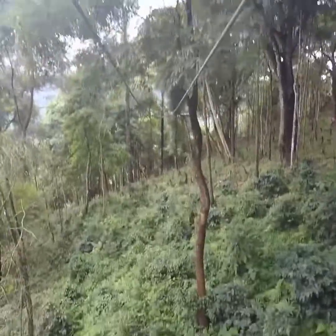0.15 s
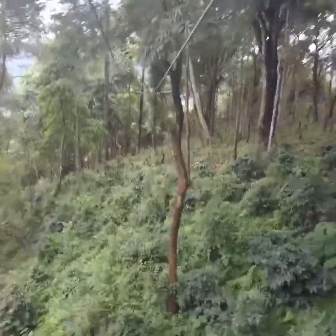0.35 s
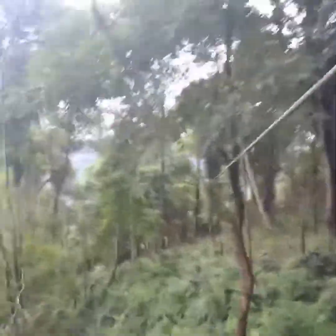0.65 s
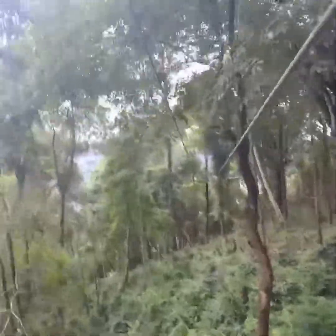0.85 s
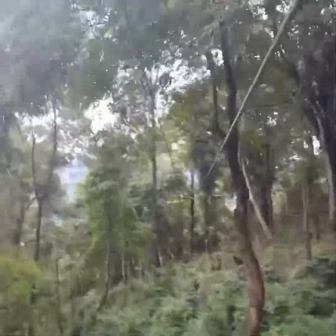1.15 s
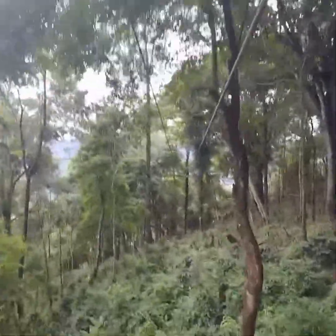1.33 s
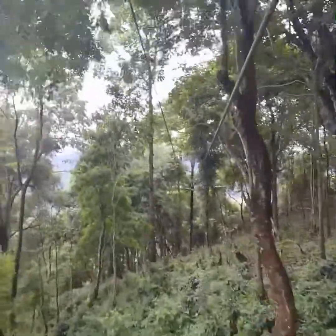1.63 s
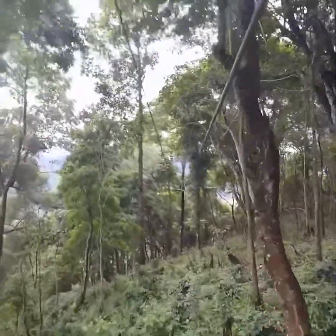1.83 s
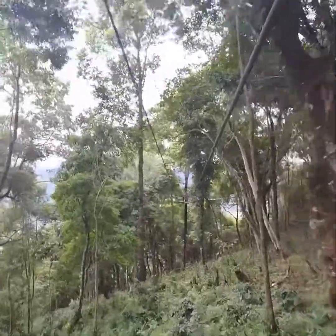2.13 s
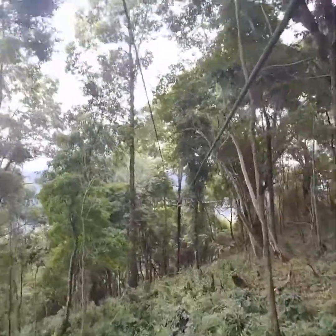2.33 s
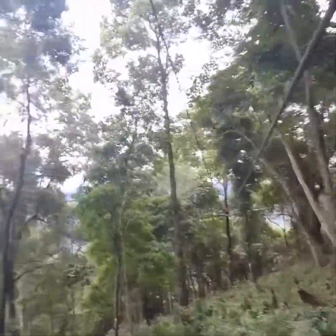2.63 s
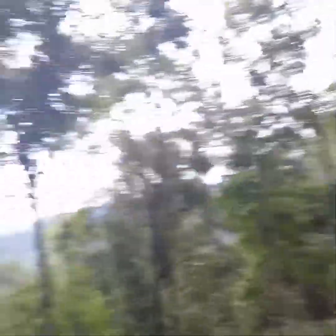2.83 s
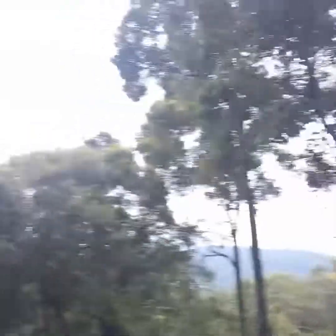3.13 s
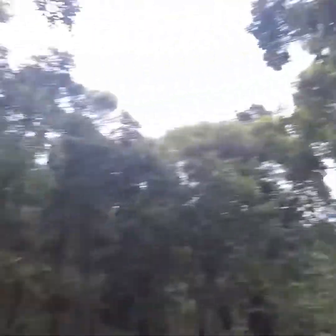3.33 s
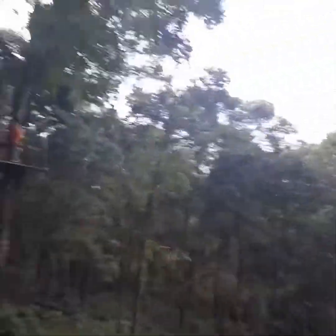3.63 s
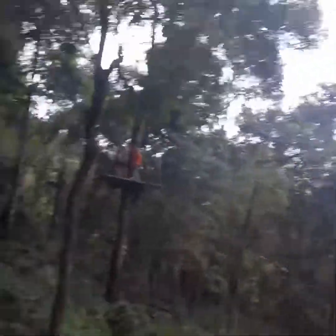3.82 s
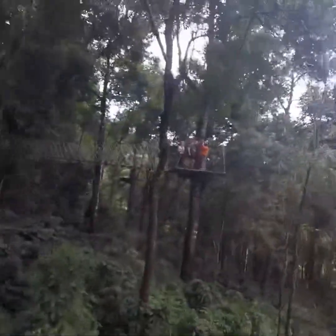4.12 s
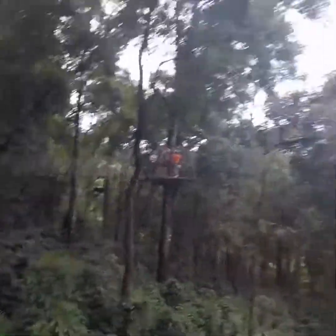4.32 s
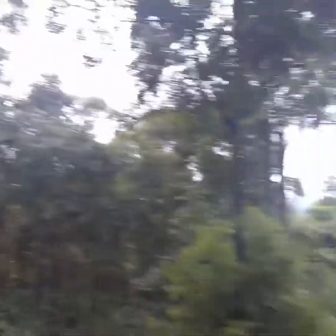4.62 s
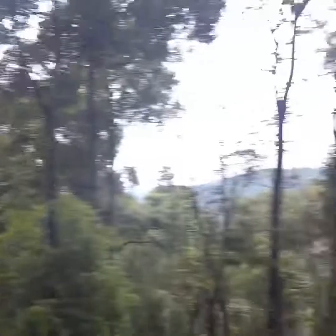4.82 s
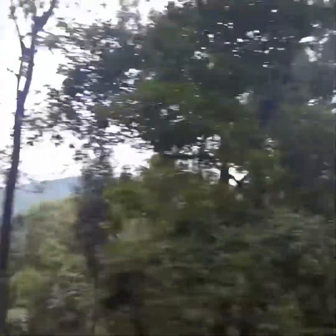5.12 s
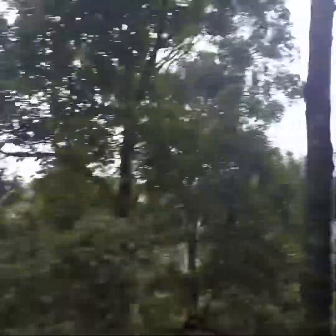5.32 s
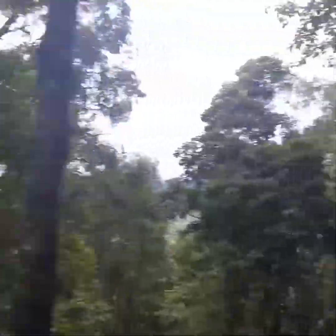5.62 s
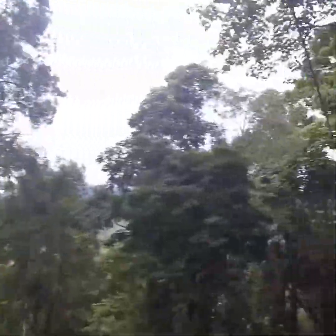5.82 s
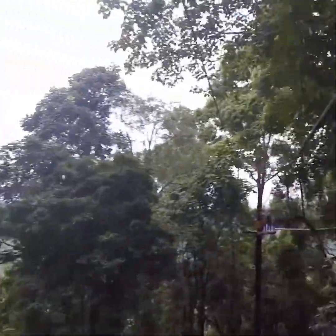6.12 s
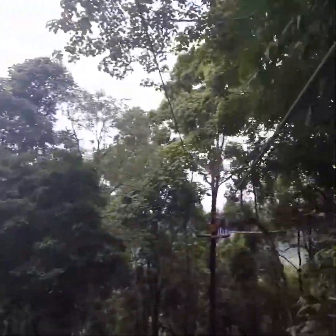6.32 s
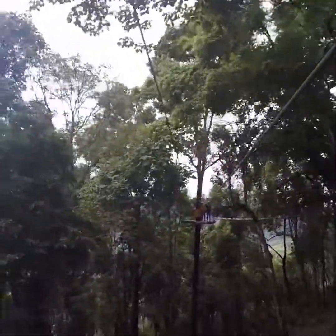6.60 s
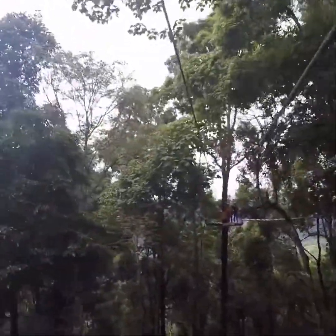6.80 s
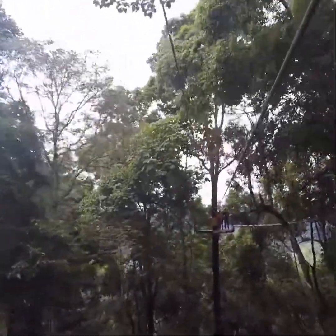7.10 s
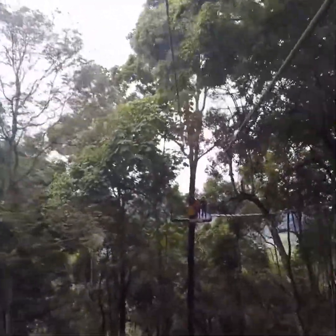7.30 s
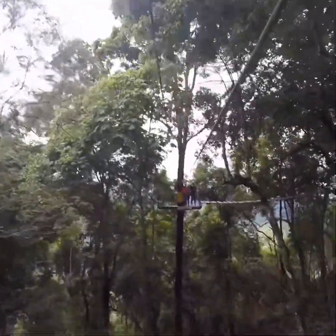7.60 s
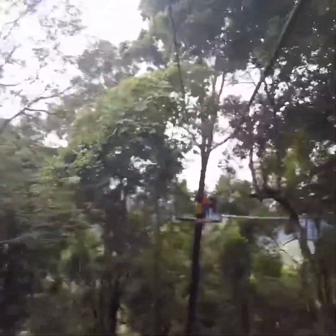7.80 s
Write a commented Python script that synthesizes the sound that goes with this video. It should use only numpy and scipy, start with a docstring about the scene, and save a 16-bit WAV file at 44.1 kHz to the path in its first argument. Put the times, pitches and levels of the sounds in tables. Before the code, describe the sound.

Outdoors in forest, heard close from a rider's hand-held camera, mono. At 0 s a rapid cluster of tiny steel hook ticks sits over faint, gritty wheel hiss; more ticks come near 0.5 and 0.6 s as wind rumble surges, and a clearer one at 1.1 s. The hiss swells quickly by 1.2 s into bright, patchy metallic rolling, and a whine emerges, climbing steadily as the trolley accelerates. Soft wind pops flutter throughout. Around 2.8-3.5 s the hand rubs and lightly knocks the case while the camera swings aside; the hiss softens and shifts colour until about 4.4 s, then returns stronger. From 5 s the whine holds high, dipping briefly at jolts roughly every 0.3 s, with the hiss sagging just before each. Hard hollow knocks hit at 7.5, 7.7 and 7.8 s with rubbing and a wind surge, the pitch easing slightly, still rolling at the 8 s end.

```python
"""Zipline: a steel trolley gathers speed on the cable above a hand-held camera that turns aside and back.
Rolling hiss is patchy noise through frame resonances; the whine is harmonics of the strand-crossing rate.
A snap hook taps the frame, and the hand knocks and rubs the camera case: impulses and noise through modes.
Wind on the single microphone is low rumble, flutter and short pops."""
import sys
import numpy as np
from scipy import signal
from scipy.fft import rfft, irfft, next_fast_len
from scipy.io import wavfile
from scipy.ndimage import uniform_filter1d, map_coordinates

SR = 44100
rng = np.random.default_rng(int(sys.argv[2]) if len(sys.argv) > 2 else 0)


def materialize(psi):
    """Save the field psi as 16-bit PCM at rate SR to the path in sys.argv[1].

    A 1-D psi becomes a single channel; in a 2-D psi each row is a channel.
    """
    bounded = np.clip(np.atleast_2d(psi).T, -1, 1)
    quanta = np.round(bounded * 32767).astype(np.int16)
    wavfile.write(sys.argv[1], SR, quanta)


N = 350595

# where the camera faces: t/s, heading (0 at the start, 1 ahead, 2 aside, 3 swinging back, 4 down the line)
HEADING = [(0, 0), (.95, 0), (1.25, 1), (3.05, 1), (3.4, 2), (4.38, 2), (4.5, 3), (4.8, 3), (5.75, 4),
           (7.95, 4)]
# jolts along the cable, brief dips in the whine's pitch and swings in the hiss:
# t/s, strand-rate drop/Hz, later strand-rate rise/Hz, hiss sag just before/dB (negative: swell)
JOLTS = [(2.06, 8, 3, -1.5), (2.4, 8, 3, -0.5), (2.53, 7, 3, -0.5), (2.905, 12, 5, 0.5), (3.16, 9, 7, 0.5),
         (4.504, 32, 5, 1), (4.65, 8, 0, 0), (4.926, 25, 0, 1), (5.364, 23.5, -8, 2.5), (5.771, 24, 6, 2),
         (6.15, 26, 10, 0.5), (6.47, 26, 3, 2), (6.784, 30, 3, 2), (7.085, 18, -2, 2), (7.36, 30, 5.5, 1.5),
         (7.61, 12, 2.5, 1), (7.845, 36, 1, 0.5)]


def hiss():
    """Wire roughness shakes the frame in fine spurts; each heading weights its resonances differently."""
    # rolling hiss: t/s, level/dB, treble gain/dB
    roll = [(0.0, -38, -3.5), (0.14, -34.5, -3), (0.42, -40.5, -1), (0.63, -31.5, -2), (0.78, -31, -2),
            (0.98, -25, -2.5), (1.18, -20, -1.5), (1.5, -22, 1.5), (1.72, -20, -1), (2.15, -21.5, 1),
            (2.36, -21, 4), (2.6, -19.5, 1.5), (3.05, -19, -0.5), (3.22, -20, -0.5), (3.36, -23.5, -3.5),
            (3.5, -24, 0), (3.75, -22, -4), (3.92, -23.5, 2.5), (4.3, -25, 1), (4.65, -20, -1),
            (5.05, -20, 2), (5.5, -19, 1.5), (6.15, -18, 0), (6.9, -17.5, -2.5), (7.95, -18, -1.5)]
    level_db, bright_db = curves(roll)
    heading = curves(HEADING)[0]

    shaking = frame_modes(roughness())
    out = 0
    for k, heard in enumerate(shaking):
        facing = np.clip(1 - np.abs(heading - k), 0, 1)
        out = out + facing * unit(heard)

    treble = filtered(out, lambda f: 1 / (1 + (5100 / (f + 1)) ** 12))
    body = out - treble
    jolt_s, _, _, sag_db = np.transpose(JOLTS)
    sag_lead_s, sag_width_s, treble_share = 0.11, 0.083, 0.35
    sag_db = dips(jolt_s - sag_lead_s, sag_db, sag_width_s, sag_width_s)
    mix = amp(-sag_db) * body + amp(bright_db - treble_share * sag_db) * treble
    return amp(level_db) * notched(mix)


def roughness():
    """Noise in random spurts, with extra level swings while the wheels creep."""
    spurts = amp(.35 * wobble(90) + .75 * wobble(250) + 1.1 * wobble(600))
    creep_db, creep_knots_per_s, creep_end_s = 2, 220, 1.0
    # full for the first half of the creep, then faded out
    creep = np.clip(2 - 2 * np.arange(N) / SR / creep_end_s, 0, 1) * creep_db
    spurts = spurts * amp(creep * wobble(creep_knots_per_s))
    shake = patchy(spurts * rng.standard_normal(N), 128, 9, 4, 1.1)
    # the taut cable adds a thicket of thin, drifting resonances
    return patchy(shake, 2048, 2, 10, 2.2)


def frame_modes(shake):
    """Frame and wheel resonances weight the noise power by frequency, one output row per heading."""
    # frame and wheels: f/Hz, width/Hz, relative level/dB at headings 0 to 4
    frame = [(1108, 400, -9, -25, -23, -21.5, -32), (1615, 46, -9, -41, -55, -24, -35),
             (1884, 186, -3.5, -12.5, -7, -5, -7), (2147, 334, 2.5, -17, -1, -0.5, -25.5),
             (2390, 764, -4.5, -8, -23, -12, -7.5), (2690, 350, 2, -8.5, -5.5, -2.5, -8),
             (3194, 880, -15, -6.5, -55, -55, -5.5), (3393, 310, 4, -7.5, 1, -2, -26.5),
             (3790, 360, -20, -2, -9.5, -24, -1), (4075, 530, -6, -12, -16, -6.5, -55),
             (4520, 250, -5.5, -10.5, -29, -54, -11.5), (4690, 170, -6, -10, -8.5, -6.5, -11),
             (5350, 940, -31, -17.5, -10.5, -10, -25.5), (5707, 520, -2.5, -14.5, -12, -10.5, -6.5),
             (6000, 250, -4, -7.5, -5, -18, -10), (6400, 570, -3.5, -11.5, -4.5, -8, -55),
             (6680, 270, -18, -4, -7, -11, -9.5), (6946, 500, 1, -10.5, -8, -12.5, -4),
             (7500, 330, -15, -16.5, -17, -13, -14), (7840, 300, -21, -36, -10, -12.5, -21.5),
             (8180, 880, -9, -28.5, -7.5, -16, -32), (9000, 730, -7, -21, -38, -15.5, -20),
             (9650, 660, -17, -20, -15.5, -20, -17.5), (10310, 367, -8, -14, -14, -15, -14.5),
             (10620, 210, -33, -30, -20, -17, -21), (11040, 210, -55, -44, -32, -27, -28),
             (12740, 930, -34, -32.5, -29, -29, -28), (13600, 670, -22, -41, -28, -35, -46),
             (13990, 540, -28, -36, -38, -29, -33), (14970, 2000, -33, -43, -43, -55, -36)]
    # sharp wheel rings on top: f/Hz, width/Hz, lift/dB
    rings = [(1937, 42, 2.5), (2235, 43, 1), (3590, 110, 1), (3702, 68, 4.5), (4830, 46, 5),
             (5760, 59, 5.5), (7070, 70, 3.5), (9080, 74, 0.5), (10240, 90, 3), (11030, 40, 10),
             (13980, 70, 2)]

    def lift(f):
        return 1 + sum((amp(db) - 1) * np.abs(modes([(c, w, 0)], f)[0]) ** 2 for c, w, db in rings)

    def response(f):
        # steep skirts leave dark valleys between the resonances
        shapes = np.array([np.abs(modes([(c, w, 0)], f)[0]) ** 3.4 for c, w, *_ in frame])
        power_gains = amp(2 * np.array(frame)[:, 2:].T)
        return lift(f) * np.sqrt(power_gains @ shapes)

    return filtered(shake, response)


def notched(x):
    """Echoes off the rider's arm and head cancel gliding bands while the camera swings."""
    # cancelled bands: start t/s, end t/s, start f/Hz, end f/Hz, depth/dB
    notches = [(3.17, 3.72, 5600, 5370, 13), (4.54, 5.17, 5360, 5260, 16), (3.13, 5.12, 8160, 8480, 21),
               (4.3, 4.9, 4560, 4200, 11), (3, 4.16, 3500, 3200, 3)]
    hz, t, z = signal.stft(x, SR, nperseg=512)
    for start_s, end_s, from_hz, to_hz, depth_db in notches:
        way = np.clip((t - start_s) / (end_s - start_s), 0, 1)
        centre_hz = from_hz + (to_hz - from_hz) * way
        shape = np.exp(-((hz[:, None] / centre_hz - 1) / 0.089) ** 2)
        z = z * amp(-depth_db * np.sin(np.pi * way) ** 2 * shape)
    return signal.istft(z, SR, nperseg=512)[1][:N]


def whine():
    """Strands bump the wheels in turn: unsteady harmonics of the strand rate, dipping briefly at jolts."""
    # wheels crossing the strands: t/s, strand rate f/Hz
    strands = [(0.95, 271), (1.1, 290), (1.28, 323.5), (1.55, 342.7), (1.72, 354.7), (2.0, 374.5),
               (2.33, 399.6), (2.68, 433.4), (2.95, 446.1), (3.27, 462.5), (3.48, 456), (3.82, 487),
               (4.1, 499), (4.36, 527), (4.62, 506.8), (5.24, 530), (5.95, 536), (7.0, 537), (7.5, 532.5),
               (7.95, 516.5)]
    # one row per harmonic 1 to 7: level/dB at headings 0 to 4, before the frame's carry
    harmonics = [(-71, -69.5, -69.5, -61.5, -65), (-77, -59, -54.5, -43.5, -47.5),
                 (-88, -50, -64, -51, -39), (-52, -47, -40, -28, -32.5), (-53, -44.5, -60, -63, -60),
                 (-65, -49, -52, -46, -36.5), (-65, -46, -43, -47, -31)]
    # how readily the frame carries a tone: f/Hz, gain/dB
    carry = [(500, 0), (750, -10), (880, -0.5), (1050, 1), (1300, 5), (1430, 0.5), (1520, -6.5),
             (1740, 0.5), (1810, 8), (1900, 0.5), (2000, 1), (2200, -3.5), (3100, -0.5), (3750, 0)]
    slow_s, recover_s, rebound_lag_s, rebound_s = .06, .05, 0.101, .09
    jolt_s, drop_hz, rebound_hz, _ = np.transpose(JOLTS)
    rate_hz = curves(strands)[0] - dips(jolt_s, drop_hz, slow_s, recover_s)
    rate_hz = rate_hz + dips(jolt_s + rebound_lag_s, rebound_hz, recover_s, rebound_s)
    jitter = 1 + .004 * wobble(50) + .004 * wobble(14)
    phase = 2 * np.pi * np.cumsum(rate_hz * jitter) / SR

    heading = curves(HEADING)[0]
    tone = 0
    for k, heading_db in enumerate(harmonics, start=1):
        level_db = np.interp(heading, range(len(heading_db)), heading_db) + along(carry, k * rate_hz)
        level_db = level_db + 2.04 * wobble(18) + 1.57 * wobble(4)
        tone = tone + np.sqrt(2) * amp(level_db) * np.sin(k * phase)
    fade_in = np.clip((np.arange(N) / SR - strands[0][0]) / .15, 0, 1)
    return tone * fade_in


def hook():
    """The snap hook taps the frame: impulses through damped steel modes and a low-pass."""
    # taps: t/s, level/dB
    ticks = [(.0545, -30), (.0575, -32), (.0665, -33), (.0735, -28), (.0805, -31), (.0838, -23),
             (.493, -31), (.615, -29), (1.108, -21)]
    # hook modes: f/Hz, width/Hz, level/dB
    hook_modes = [(2700, 250, -1), (3580, 400, -10), (5930, 500, 19.5), (8800, 900, -3)]
    taps = blows(ticks, np.array(ticks)[:, 1] + 17)
    return filtered(taps, lambda f: sum(modes(hook_modes, f)) / (1 + 1j * f / 6000) ** 2)


def case():
    """Knocks (impulses) and hand rubbing (uneven noise) ring the modes of the hollow camera case."""
    # knocks: t/s, level/dB, relative thud/dB, relative upper ring/dB
    knocks = [(2.819, -37.5, 4, -1), (2.886, -44, 7, -2), (3.097, -46, 14.5, -12), (7.482, -21, 2.5, -10.5),
              (7.711, -37, 3, -13), (7.739, -15.5, -9.5, -20), (7.826, -23, 3, -5.5)]
    # rubs: t/s, length/s, level/dB, relative upper ring/dB
    rubs = [(0.229, .04, -55.5, -8), (.66, .02, -51, -8), (1.723, 0.059, -55.5, 2), (2.81, 0.045, -41, -2),
            (2.865, 0.23, -44, 0), (3.221, .04, -44.5, -5), (3.299, 0.11, -38.5, -6.5),
            (3.436, 0.065, -50, -5), (7.48, 0.027, -31, -7), (7.539, 0.11, -48, 2),
            (7.704, 0.039, -39.5, -6), (7.808, 0.054, -35, -13), (7.9, .05, -49, -2)]
    # case modes, low to high: f/Hz, width/Hz, level/dB
    thud_modes = [(63.4, 33, 0)]
    hollow_modes = [(218.4, 53, 0)]
    shell_modes = [(777, 104, 7.5), (1080, 130, 6), (1500, 130, -7), (400, 360, -9)]

    def thud(f):
        return modes(thud_modes, f)[0] / (1 + 1j * f / 130) ** 2

    def hollow(f):
        return modes(hollow_modes, f)[0] ** 2

    def shell(f):
        return sum(modes(shell_modes, f))

    _, knock_db, thud_db, upper_db = np.transpose(knocks)
    out = filtered(blows(knocks, knock_db + 49.5), hollow)
    out += filtered(blows(knocks, knock_db + upper_db + 34), shell)
    out += filtered(blows(knocks, knock_db + thud_db + 59.5), thud)

    skin = amp(2.7 * wobble(60)) * rng.standard_normal(N)
    low = unit(filtered(skin, lambda f: hollow(f) ** 2))
    upper = unit(filtered(skin, shell))
    t = np.arange(N) / SR
    press_s, lift_db_per_s = .012, 500
    for start_s, length_s, rub_db, ring_db in rubs:
        press = np.clip((t - start_s) / press_s, 0, 1)
        release = amp(-lift_db_per_s * np.maximum(t - start_s - length_s, 0))
        out += press * release * amp(rub_db) * (low + amp(ring_db) * upper)
    return out


def wind():
    """Turbulence on the microphone port: lumpy low rumble, flutter, and eddies popping as one quick push."""
    # wind: t/s, buffeting level/dB, quicker part level/dB, flutter level/dB
    gusts = [(0.0, -36, -49, -62), (0.33, -33, -51, -64), (0.5, -30, -48, -66), (0.57, -20, -43, -60),
             (0.7, -22.5, -43.5, -56), (1.05, -26, -47, -66), (1.9, -36, -56, -60),
             (2.65, -35.5, -57, -62.5), (2.9, -36.5, -41, -58), (3.25, -37.5, -48.5, -55),
             (3.7, -29, -42, -63), (4.1, -34.5, -51, -59), (4.25, -42, -52, -62), (4.75, -33.5, -48, -55),
             (5.5, -38, -50.5, -56.5), (5.8, -42.5, -53, -59), (6.45, -34, -51, -58), (6.65, -40, -50, -59),
             (6.8, -29, -54, -60.5), (7.4, -36.5, -51, -55), (7.8, -27, -35, -51), (7.95, -33, -40, -45)]
    # rumble spectrum: f/Hz, gain/dB
    rumble_spectrum = [(7, -20), (14, 10.5), (40, 4), (75, -17.5), (120, -26), (300, -47), (600, -46),
                       (1500, -120)]
    # pops: t/s, level/dB
    pop_rows = [(0.061, -40), (0.2, -46), (0.518, -42), (0.619, -36), (0.665, -38), (0.712, -32.5),
                (0.788, -35), (0.85, -37), (1.021, -33), (1.071, -35), (1.29, -36), (1.388, -39),
                (1.482, -35.5), (1.549, -39), (1.689, -35), (2.32, -38), (3.632, -41), (3.681, -35),
                (3.732, -35), (3.848, -35), (3.961, -38), (4.042, -41), (4.11, -43), (4.438, -40),
                (4.694, -39), (4.767, -43), (4.807, -38), (5.264, -38), (5.327, -41), (5.876, -36),
                (5.909, -38), (6.569, -38.5), (6.633, -36), (6.899, -44), (6.943, -41), (7.237, -38)]
    level_db, quick_db, flutter_db = curves(gusts)

    rumble = filtered(rng.standard_normal(N), lambda f: amp(along(rumble_spectrum, f)))
    quick = filtered(rumble, lambda f: 1 / (1 + (55 / (f + 1)) ** 8))  # above about 55 Hz
    rumble = amp(level_db) * unit(rumble - quick) + amp(quick_db) * unit(quick)
    gusty_db = 2
    lumps = amp(gusty_db * wobble(9))

    eddies = amp(4 * wobble(25)) * rng.standard_normal(N)
    flutter = unit(filtered(eddies, lambda f: modes([(163, 180, 0)], f)[0] ** 2))

    def push(f):
        delay = np.exp(-2j * np.pi * f * 0.00245)  # 2.45 ms
        return modes([(303, 320, 0)], f)[0] * modes([(413, 1800, 0)], f)[0] * delay

    pops = filtered(blows(pop_rows, np.array(pop_rows)[:, 1] + 33), push)
    return lumps * rumble + amp(flutter_db) * flutter + pops


def amp(db):
    """Gain of a level in dB."""
    return 10 ** (np.asarray(db) / 20)


def unit(x):
    """Scaled to rms 1."""
    return x / np.sqrt(np.mean(x ** 2) + 1e-20)


def along(points, hz):
    """(Hz, value) points on a log axis."""
    f, v = np.transpose(points)
    return np.interp(np.log(hz + 1), np.log(f + 1), v)


def curves(rows):
    """One value per sample for each column after the time."""
    s, *cols = np.transpose(rows)
    return [np.interp(np.arange(N) / SR, s, c) for c in cols]


def wobble(rate):
    """A smooth random curve, rate knots a second."""
    return map_coordinates(rng.standard_normal(int(N * rate / SR) + 4), [np.arange(N) * rate / SR])


def filtered(x, response):
    """x times a complex response of frequency."""
    m = next_fast_len(N + SR // 2)
    return irfft(rfft(x, m) * response(np.fft.rfftfreq(m, 1 / SR)), m)[..., :N]


def modes(rows, f):
    """Complex response of each (Hz, width, dB) resonance."""
    return [amp(db) * 1j * f * w / (c * c - f * f + 1j * f * w) for c, w, db in rows]


def blows(rows, db):
    """An impulse at each row's time."""
    x = np.zeros(N)
    x[np.round(np.array(rows)[:, 0] * SR).astype(int)] = amp(db)
    return x


def patchy(x, size, tall, long, depth_db):
    """x under a random time-frequency gain, smoothed over tall bins and long frames, depth_db rms."""
    z = signal.stft(x, SR, nperseg=size)[2]
    field = uniform_filter1d(rng.standard_normal(z.shape), tall, 0)
    field = uniform_filter1d(field, long, 1)
    return signal.istft(z * amp(depth_db * unit(field)), SR, nperseg=size)[1][:N]


def dips(times, sizes, before_s, after_s):
    """Sum of Gaussian bumps of signed size, with separate widths before and after each peak."""
    t = np.arange(N) / SR
    return sum(size * np.exp(-((t - s) / np.where(t < s, before_s, after_s)) ** 2)
               for s, size in zip(times, sizes))


def scene():
    """One microphone feeds both channels."""
    mono = hiss() + whine() + hook() + case() + wind()
    return np.tile(mono, (2, 1))


def record(dry):
    """The camera keeps nothing above its band limit."""
    top_hz = 15270
    return filtered(dry, lambda hz: hz < top_hz)


dry = scene()
out = record(dry)
materialize(out)
```